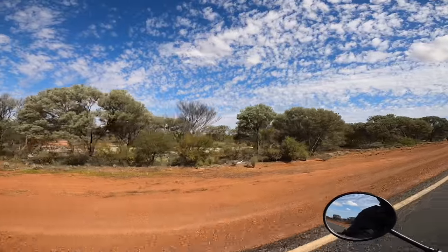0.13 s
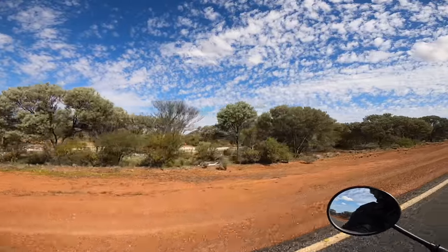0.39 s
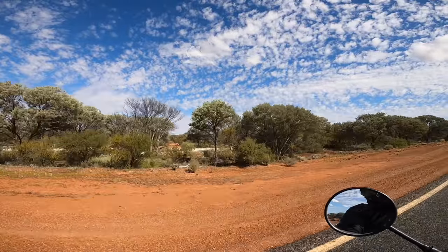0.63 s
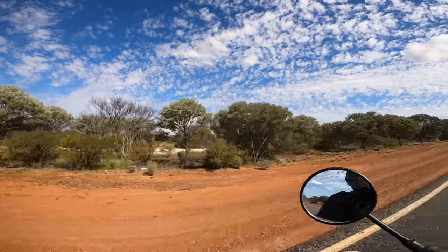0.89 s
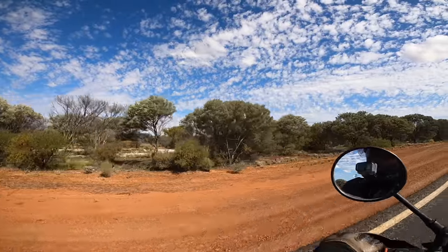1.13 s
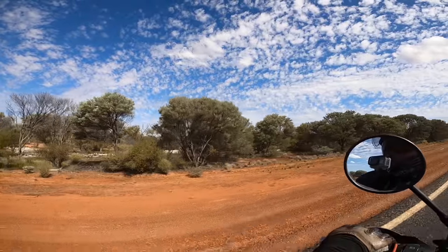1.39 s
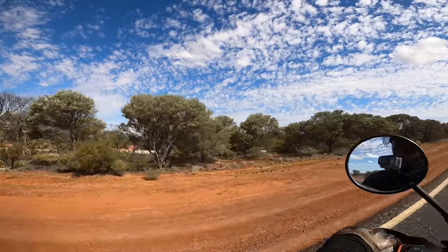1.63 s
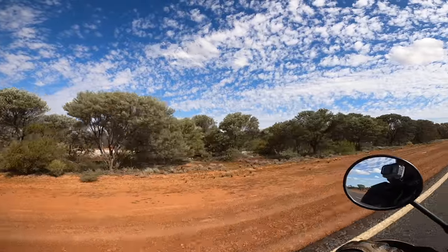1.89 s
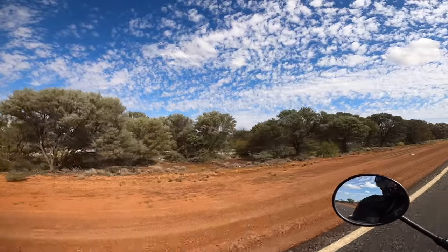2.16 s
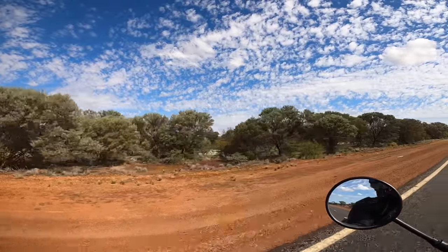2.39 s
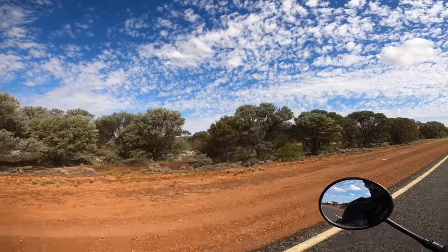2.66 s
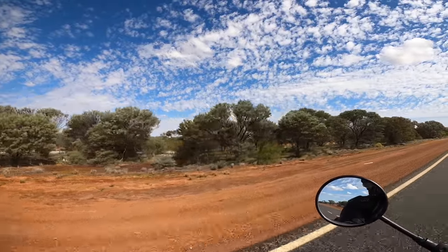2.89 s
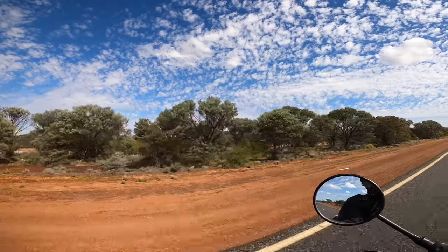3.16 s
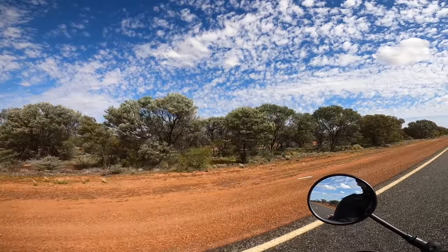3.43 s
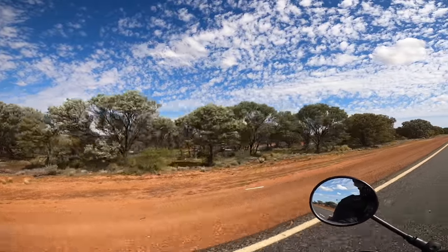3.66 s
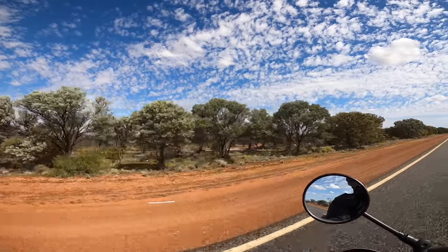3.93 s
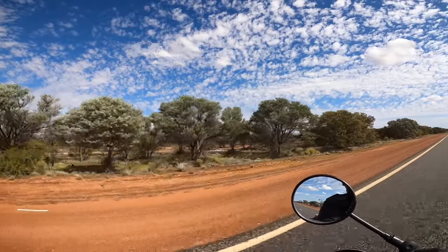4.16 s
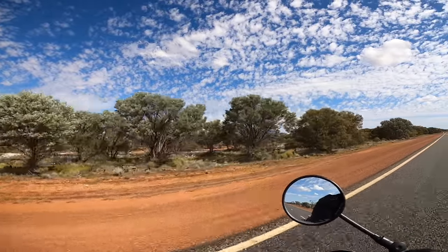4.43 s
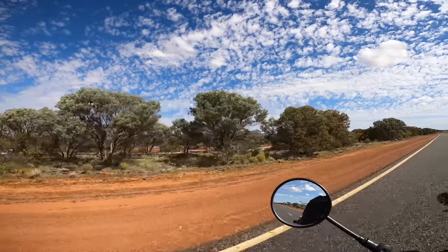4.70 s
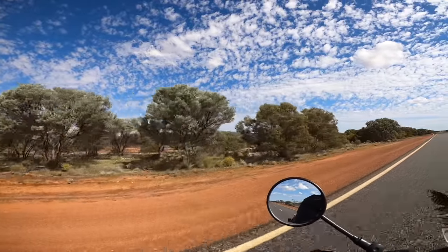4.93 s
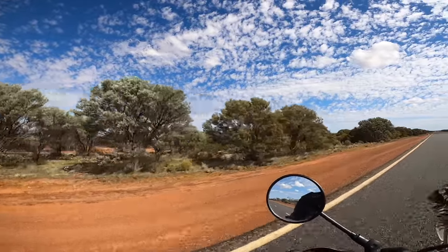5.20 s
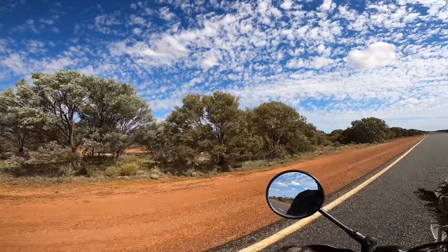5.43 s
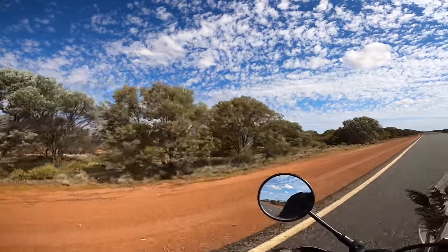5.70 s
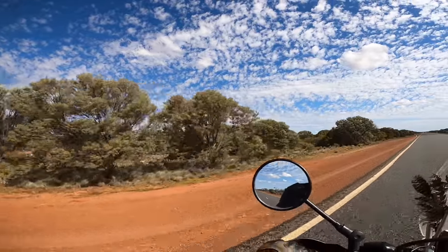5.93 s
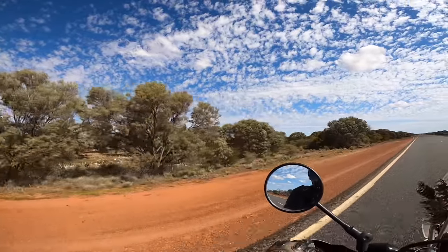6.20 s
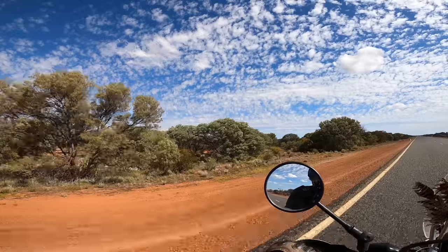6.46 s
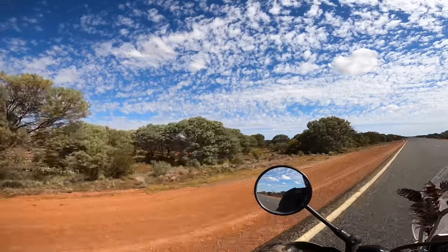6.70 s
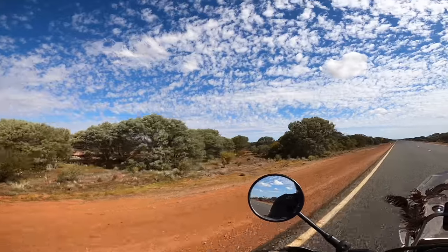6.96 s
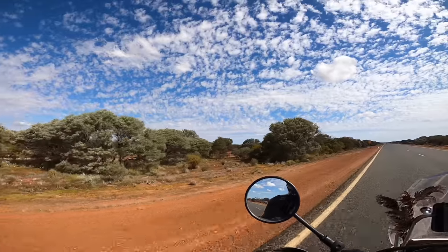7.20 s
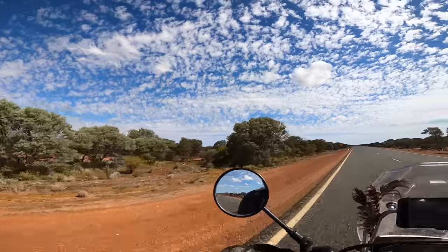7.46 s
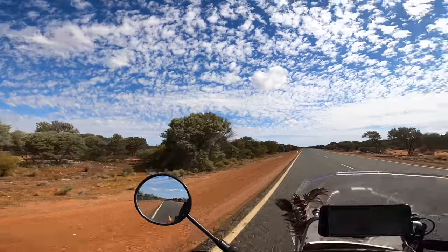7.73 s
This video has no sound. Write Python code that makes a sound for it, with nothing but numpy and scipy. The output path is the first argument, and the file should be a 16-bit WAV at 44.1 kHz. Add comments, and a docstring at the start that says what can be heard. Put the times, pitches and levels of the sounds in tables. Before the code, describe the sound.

A single-cylinder motorcycle pulls up through two gear changes while strong wind thumps and rumbles against a rider's microphone, with small clicks.

```python
"""Motorcycle through two gear changes

A single-cylinder motorcycle accelerates on an open road, heard by a helmet camera.
The air stream sheds eddies that thump the microphone near 50 Hz, and rushes past its ports as coloured noise.
Firing pulses and valve ticks ring the resonances of the housing, beside pure tones locked to engine speed.
Short single clicks, knocks and some sharper firing pulses, stand out; a limiter holds the thumps down.
"""
import sys
import numpy as np
from scipy import signal
from scipy.fft import rfft, irfft, next_fast_len
from scipy.io import wavfile
from scipy.ndimage import uniform_filter1d

SR = 44100
rng = np.random.default_rng(int(sys.argv[2]) if len(sys.argv) > 2 else 0)


def generate_wav(signal):
    """Clip the signal to [-1, 1] and save it as 16-bit WAV at the path in sys.argv[1]."""
    frames = np.transpose(np.atleast_2d(signal))
    scaled = np.clip(frames, -1, 1) * 32767
    pcm = np.round(scaled).astype(np.int16)
    wavfile.write(sys.argv[1], SR, pcm)


def gain_from_db(level_db):
    """Convert decibel levels to linear amplitude factors (20 dB per decade)."""
    decades = np.asarray(level_db, float) / 20
    return 10 ** decades


N = 345744
TIME = np.arange(N) / SR  # s
HZ = np.fft.rfftfreq(next_fast_len(N + SR // 4), 1 / SR)  # frequency bins, with room for ringing tails

# resonances of the microphone housing: centre_hz, width_hz, left_db, right_db, right_phase_rad
HOUSING_MODES = [(274, 33.3, 1.5, 0.4, -0.12), (501.7, 67.5, -4.5, -7.5, 0), (608.4, 36.3, -6.5, -9.5, 0),
                 (738, 133, -12.5, -16, 0.73), (1084, 105, -10, -12, 0.17), (1361, 141, -13.5, -20, 0.81),
                 (1666, 221, -12, -12.5, 1), (2224, 173, -9, -13, 2.5), (2499, 125, 0.5, -5.5, 1.85),
                 (3190, 710, -19, -21.5, 0), (3785, 150, -14, -22.5, 1), (4737, 227, -21, -11, -0.5),
                 (5350, 1300, -39, -28, 5.5), (7640, 1800, -50, -44.5, 0)]
# the air stream over time: time_s, buffeting_db, port_rush_db, rush_brightness_db
AIR_STREAM = [(0.0, -18.5, -33.5, 2.7), (0.5, -20, -34.5, 1.1), (0.8, -13.5, -31, -2.7),
              (1.0, -22.5, -32.5, -2.5), (1.08, -21.5, -36, -3), (1.45, -26.5, -39, -0.5),
              (1.75, -21.5, -36.5, -1.5), (1.85, -21, -34, -2.5), (2.3, -24, -32, -0.5),
              (3.15, -23, -34.5, 0.4), (3.45, -22.5, -37, 1.1), (3.85, -18, -31.5, 0.5),
              (4.4, -21.5, -36.5, 1), (4.9, -26, -38.5, 2.8), (5.45, -23, -33.5, -1.4),
              (5.7, -26.5, -41.5, -1.1), (6.12, -30.5, -40.5, -1.2), (6.25, -20.5, -37, -1.6),
              (7.0, -23, -36, -0.6), (7.33, -19.5, -35, -1), (7.42, -28.5, -40, 0.3),
              (7.84, -29.5, -41, -0.3)]
# short gusts on top of the buffeting and the rush: middle_s, swell_db
GUST_SWELLS = [(.01, 1), (.28, 2), (.41, 5), (.59, 4.5), (.97, 2.5), (2.05, 1.5), (2.25, 3), (2.97, 1),
               (3.23, 0), (3.43, 0), (3.69, 2), (4.5, 1), (4.65, 2), (5.24, -1), (5.41, -1), (5.8, 2.5),
               (5.92, 3), (6.68, 2.5), (6.99, 3), (7.56, 0.5)]
# spectrum of the rush before the housing: frequency_hz, density_db
RUSH_SPECTRUM = [(100, -1.5), (280, -5), (500, -8.5), (800, -3.5), (1100, 1.5), (1900, -7.5), (2500, -17),
                 (2800, -12), (3200, -6), (4200, -8), (5000, -10), (8000, -3.5)]
# how alike the rush is at the two ports before the housing: frequency_hz, shared_power (0 to 1)
PORT_SHARING = [(330, .999), (600, .97), (800, 0.88), (1500, .86), (2500, .85), (3500, 0.8), (4500, 0.36),
                (7000, 0.3)]
# eddies shed against the microphone: time_s, mean_shedding_hz, thump_db
EDDY_SHEDDING = [(0.0, 50.85, -18), (0.3, 56.28, -17.5), (0.72, 62.97, -23.5), (1.0, 51.52, -17),
                 (1.75, 51.43, -16.5), (2.1, 59.82, -18), (2.5, 46.3, -15), (2.9, 53.62, -17),
                 (3.55, 54.86, -18.5), (4.1, 51.5, -18), (4.3, 47.34, -16), (4.5, 53.33, -17.5),
                 (4.75, 45.13, -14), (5.18, 53.73, -17.5), (5.4, 47.6, -13.5), (5.95, 53, -15),
                 (6.55, 49.8, -15), (7.25, 53.22, -15.5), (7.55, 48.86, -14.5), (7.84, 54.7, -13)]
# short random dips and swells in the level of the low rumble: middle_s, dip_db (negative swells)
RUMBLE_DIPS = [(.11, 12), (.24, 10), (.63, 3), (.82, 30), (1.22, 25), (1.31, 0), (1.55, 2), (1.72, 17),
               (1.8, 19), (1.99, 7), (2.05, 21.5), (2.31, 6), (2.44, 8), (2.57, 20), (2.81, 12), (2.97, 12),
               (3.3, 4), (3.52, 14), (3.66, 33), (3.8, 28), (4.13, 13), (4.31, 15), (4.45, 3), (4.76, 8),
               (4.93, 7), (5.2, -0.5), (5.54, 10), (5.65, 5), (5.82, 11), (6.05, 5), (6.29, 28), (6.74, 10),
               (6.92, -3.5), (7.07, 26), (7.18, 12), (7.29, 13), (7.49, 12.5), (7.69, 22)]
# spectrum of the low buffeting: frequency_hz, density_db
BUFFET_SPECTRUM = [(12, -31), (22, -11.5), (32, -2), (45, 0.5), (80, -5), (110, -9.5), (160, -13),
                   (200, -16.5), (300, -22), (450, -38), (900, -70)]
# short single clicks, knocks and some sharper firing pulses:
# start_s, dull_peak_db, treble_burst_peak_db, burst_centre_hz
SHARP_CLICKS = [(0.268, -22, -25, 1450), (0.473, -21, -30, 1600), (0.572, -28, -38, 4000),
                (0.828, -25, -40, 3000), (1.374, -30, -46, 3000), (1.682, -26, -42, 3000),
                (1.751, -30, -30, 1450), (1.907, -30, -32, 1600), (1.929, -30, -34, 1450),
                (2.313, -24, -30, 1700), (2.391, -25, -31, 1400), (2.476, -24, -37, 3300),
                (3.232, -19, -30, 1350), (3.908, -26, -38, 3300), (5.4, -27, -32, 3000),
                (6.223, -30, -40, 3000), (6.477, -32, -34, 3600), (6.494, -25, -33, 1400),
                (7.054, -32, -40, 4300), (7.106, -26, -38, 3800)]
# engine speed through two gear changes: time_s, firings_per_s
ENGINE_SPEED = [(0.0, 55.43), (0.26, 56.95), (0.52, 58.91), (0.6, 57), (0.95, 41), (1.06, 38.8),
                (1.1, 38.68), (2.03, 46.33), (2.66, 51.08), (3.28, 55.2), (3.9, 58.95), (4.53, 62),
                (5.15, 64.67), (5.46, 65.64), (5.55, 64.2), (5.97, 49.3), (6.0, 48.73), (6.31, 50.11),
                (6.92, 52.32), (7.53, 54.35), (7.84, 55.53)]
# engine load, before the closed-throttle losses: time_s, exhaust_db, valve_tick_db
ENGINE_LOAD = [(0.0, -29, -39), (0.25, -32, -40), (0.48, -33.5, -41.5), (0.56, -33, -45), (0.75, -25, -42),
               (0.82, -30.5, -39), (0.87, -26, -31), (0.95, -24.5, -30.5), (1.03, -23, -32.5),
               (1.08, -30.5, -46), (1.5, -33.5, -67), (2.1, -29.5, -58), (2.3, -29, -51.5),
               (2.7, -32, -38.5), (3.1, -33, -44.5), (3.4, -33, -44), (3.7, -34, -47), (4.55, -36, -47.5),
               (5.45, -42, -47.5), (5.55, -40, -50), (5.92, -35.5, -39), (6.05, -36.5, -48),
               (6.5, -34.5, -45.5), (6.9, -34.5, -46), (7.4, -36, -46.5), (7.84, -40, -48.5)]
# spectrum of one exhaust pulse before the housing: frequency_hz, density_db
EXHAUST_SPECTRUM = [(40, -8.5), (150, -3.5), (280, 1), (350, -1), (420, -2), (500, 2), (620, -1.5),
                    (780, -13), (1000, -2.5), (1200, -8), (2000, -23.5), (4000, -47.5)]
# the higher overtones leave the pipe later: frequency_hz, delay_s
PIPE_DELAY = [(300, 0), (420, .0006), (700, .002)]
# the valve cover rings with each tick, its second ring only at speed: centre_hz, width_hz, ring_db
COVER_RINGS = [(2585, 105, 18), (2230, 170, 24)]
# engine and gear tones that come and go, before their left-right lean:
# middle_s, half_length_s, peak_db, cycles_per_firing
ENGINE_TONES = [(.3, .22, -52, 52), (.25, .25, -36, 19), (.3, .22, -39, 17), (.4, .3, -30, 5),
                (.25, .25, -55, 42), (2.4, .17, -46, 52), (2.62, .13, -50, 50), (2.85, .3, -50, 19),
                (4.25, .6, -47, 16), (4.1, .5, -51, 17), (6.25, .3, -58, 52), (7.5, .3, -63, 52)]


def rms_one(x):
    """Scale to rms 1."""
    return x / np.sqrt(np.mean(x ** 2) + 1e-20)


def in_time(rows):
    """Each column of a curve table at every sample."""
    s, *columns = np.transpose(rows)
    return [np.interp(TIME, s, c) for c in columns]


def at_hz(points):
    """A short spectrum read at every frequency bin, along a log frequency axis."""
    hz, values = np.transpose(points)
    return np.interp(np.log(HZ + 1), np.log(hz), values)


def swells(rows, half_s):
    """Sum of bell-shaped swells in dB, one per (s, dB) row; half_s is the spread of the bell."""
    t = np.arange(0, N + 64, 64) / SR
    s, db = np.transpose(rows)
    bells = np.exp(-.5 * ((t - s[:, None]) / half_s) ** 2)
    return np.interp(TIME, t, db @ bells)


def through(x, response):
    """Filter by a frequency response."""
    size = 2 * (len(HZ) - 1)
    return irfft(rfft(x, size) * response, size)[..., :N]


def above(hz, steepness):
    """Response that passes what lies above hz, without phase shift."""
    return 1 / (1 + (hz / (HZ + 1)) ** steepness)


def resonance(hz, width):
    """Response of a damped mass on a spring, 1 at its peak."""
    return 1j * HZ * width / (hz ** 2 - HZ ** 2 + 1j * HZ * width)


def causal(db):
    """The response of these levels that rings only after the blow (minimum phase)."""
    cepstrum = irfft(db * np.log(10) / 20)
    cepstrum[1:len(HZ) - 1] *= 2
    return np.exp(rfft(cepstrum * (np.arange(len(cepstrum)) < len(HZ))))


def drift(rate):
    """Random wandering, mostly slower than rate in Hz; spread 1."""
    lowpass = 1 / (1 + 1j * HZ / rate) ** 2
    return rms_one(through(rng.standard_normal(N), lowpass * (HZ > .3)))


def pulses(cycles, spread_db, jitter_s):
    """One click per cycle, placed between samples, each of its own strength."""
    at = np.interp(np.arange(np.ceil(cycles[0]), cycles[-1]), cycles, np.arange(N))
    chance = rng.standard_normal((len(at), 2))
    at = np.clip(at + jitter_s * SR * chance[:, 0], 0, N - 2)
    whole = at.astype(int)
    strength = gain_from_db(spread_db * chance[:, 1])
    out = np.zeros(N)
    out[whole] = strength * (1 - at + whole)
    out[whole + 1] = strength * (at - whole)
    return out


def housing():
    """Left and right response of the housing: resonances in parallel, signs alternating."""
    out = np.zeros((2, len(HZ)), complex)
    for k, (hz, width, left_db, right_db, turn) in enumerate(HOUSING_MODES):
        mode = (-1) ** k * resonance(hz, width)
        out += mode * [[gain_from_db(left_db)], [gain_from_db(right_db) * np.exp(1j * turn)]]
    return out


def gusts():
    """Short swells of the air stream in dB."""
    return swells(GUST_SWELLS, half_s=.046)


def rush(body):
    """Turbulence at the ports, shared in the bass and private in the treble; each range flickers by itself."""
    _, rush_db, brightness_db = in_time(AIR_STREAM)
    rush_db = rush_db + gusts()
    hiss_db = rush_db - 3.5 + brightness_db
    alike = np.clip(at_hz(PORT_SHARING), 0, 1)
    shared, own = rng.standard_normal(N), rng.standard_normal((2, N))
    air = through(shared, np.sqrt(alike)) + through(own, np.sqrt(1 - alike))
    colour = gain_from_db(at_hz(RUSH_SPECTRUM)) * body
    colour = colour / np.sqrt(np.mean(np.abs(colour) ** 2))
    low = 1 / (1 + (HZ / 720) ** 6)
    high = above(2200, 6)
    flutter = 0.5 * drift(11)  # dB, common to all three ranges
    lows = through(air * gain_from_db(rush_db + flutter + 0.58 * drift(38)), colour * low)
    mids = through(air * gain_from_db(rush_db + flutter + 1.3 * drift(33)), colour * (1 - low - high))
    highs = through(air * gain_from_db(hiss_db + flutter + 1.5 * drift(42)), colour * high)
    return lows + mids + highs


def thumps():
    """Shed eddies: a low unsteady tone in rumble, under broad lumpy buffeting; both ports feel them alike."""
    hz, thump_db = in_time(EDDY_SHEDDING)
    buffet_db = in_time(AIR_STREAM)[0] + gusts()
    unsteady_hz = hz * (1 + .08 * drift(17))
    tone = np.sqrt(2) * np.sin(2 * np.pi * np.cumsum(unsteady_hz) / SR)
    rumble_band = resonance(33, 25) / (1 + (HZ / 70) ** 4)
    rumble = rms_one(through(rng.standard_normal(N), rumble_band))
    buffet = rms_one(through(rng.standard_normal(N), gain_from_db(at_hz(BUFFET_SPECTRUM))))
    # the level dips and swells briefly, as narrowband noise does when it beats
    eddy_db = thump_db - swells(RUMBLE_DIPS, half_s=.011) + 0.94 * drift(39)
    eddies = gain_from_db(eddy_db) * (tone + gain_from_db(-11.5) * rumble)
    both = eddies + gain_from_db(buffet_db + 2.14 * drift(12.0)) * buffet
    left_lag_s = .00006  # the thumps reach the left port a little later
    left = through(both, np.exp(-2j * np.pi * HZ * left_lag_s))
    return np.array([left, both]) * gain_from_db([[.7], [-.8]])


def sharp_clicks(body):
    """Each click is one dull pulse through the housing and a short burst of grains of its own brightness."""
    dull, bright = np.zeros(N), np.zeros(N)
    t = np.arange(400) / SR
    decay_s, rise_s = .0025, .0003
    band_span = 1.35  # the band reaches this factor either side of the centre
    envelope = np.exp(-t / decay_s) * (1 - np.exp(-t / rise_s))
    all_grains = rng.standard_normal((len(SHARP_CLICKS), 400))
    for (s, db, bright_db, hz), grains in zip(SHARP_CLICKS, all_grains):
        i = round(s * SR)
        dull[i] = gain_from_db(db)
        band = signal.butter(4, [hz / band_span, hz * band_span], "band", fs=SR, output="sos")
        burst = signal.sosfilt(band, envelope * grains)
        bright[i:i + 400] += gain_from_db(bright_db) * burst / np.abs(burst).max()
    thud = body * (1j * HZ / (800 + 1j * HZ)) ** 6 / (1 + 1j * HZ / 1100) ** 8
    return through(dull, thud / np.abs(irfft(thud)).max()) + bright


def exhaust_note(cycles, revs, shut, body):
    """Firing pulses through pipe and housing; overtones grow with speed and fade on a shut throttle."""
    firing = pulses(cycles, spread_db=1.0, jitter_s=.00005)
    # summing the delay over frequency gives the phase of the pipe
    pipe_phase = 2 * np.pi * HZ[1] * np.cumsum(at_hz(PIPE_DELAY))
    pipe = causal(at_hz(EXHAUST_SPECTRUM)) * np.exp(-1j * pipe_phase)
    note = through(firing, pipe * body)
    bark = gain_from_db(.5 * (revs - 52)) - 1  # half a dB per firing/s, neutral at 52 firings/s
    note = note + bark * through(note, above(850, 8))
    note = note - shut * (1 - gain_from_db(-15)) * through(note, above(340, 6))
    return rms_one(note)


def valve_train(cycles, revs, shut, body):
    """Two valve ticks a cycle ring the cover and the upper housing; loose parts rattle just after the first."""
    always, at_speed = (gain_from_db(db) * resonance(hz, width) for hz, width, db in COVER_RINGS)
    hard = np.clip((revs - 52) / 6, 0, 1)  # the second ring sets in from 52 to 58 firings/s
    upper = body * (1j * HZ / (2100 + 1j * HZ)) ** 4 / (1 + (HZ / 2800) ** 10)
    tick_cycles = cycles + .24  # the tick leads the firing by this share of a cycle
    first = pulses(tick_cycles, spread_db=1.5, jitter_s=.000015)
    # the second valve seats a little under half a cycle later, so at speed every other overtone stands out
    second = pulses(tick_cycles - .4615, spread_db=1.5, jitter_s=.000015)
    ticks = first + np.clip((revs - 50) / 13, 0, 1) * second  # full strength at 63 firings/s
    ticks = through(ticks, upper * (1 + always)) - through(hard * ticks, upper * at_speed)
    gate = np.exp(-(tick_cycles % 1) / .3)
    clatter = through(gate * rng.standard_normal(N), upper * (1 + always / 4))
    clatter_db = -11 + 6 * shut  # more rattle with the throttle shut
    return rms_one(ticks) + gain_from_db(clatter_db) * rms_one(clatter)


def engine_whine(cycles):
    """Sine tones locked to the engine speed; the higher the order, the more it leans left."""
    whine = np.zeros((2, N))
    for s, half, db, order in ENGINE_TONES:
        lean_db = order * np.array([[.05], [-.08]])
        fade = np.exp(-.5 * ((TIME - s) / half) ** 4)
        whine += gain_from_db(db + lean_db) * fade * np.sin(2 * np.pi * order * cycles)
    return whine


def engine(body):
    """Exhaust, valve train and whine, all driven by one count of firing cycles."""
    exhaust_db, tick_db = in_time(ENGINE_LOAD)
    revs = in_time(ENGINE_SPEED)[0]
    cycles = np.cumsum(revs) / SR + .86  # share of a cycle already run at the start
    # falling revs mean a shut throttle
    shut = uniform_filter1d(1. * (np.diff(revs, prepend=0) < 0), size=2000)
    exhaust = gain_from_db(exhaust_db) * exhaust_note(cycles, revs, shut, body)
    valves = gain_from_db(tick_db - 7.5 * shut) * valve_train(cycles, revs, shut, body)
    return exhaust + valves + engine_whine(cycles)


def scene():
    """Rush, dull clicks, exhaust and valves sound through the housing; thumps, treble bursts and whine do not."""
    body = housing()
    return rush(body) + thumps() + sharp_clicks(body) + engine(body)


def band_limit(x):
    """A steep low-pass at the top of the band."""
    return signal.sosfilt(signal.butter(12, 15650, fs=SR, output="sos"), x)


def record(dry):
    """A limiter follows the peaks and ducks all under the thumps; a steep shelf dulls all above about 8 kHz."""
    level_db = 20 * np.log10(np.abs(dry).max(axis=0) + 1e-9)
    fall = TIME * 60  # release, dB per second
    held = np.maximum.accumulate(level_db + fall) - fall
    over = uniform_filter1d(np.maximum(held + 7.23, 0), size=300)  # dB above the threshold
    limited = dry * gain_from_db(-.85 * over)
    shelf = 1 / (1 + (HZ / 7850) ** 30) + gain_from_db(-12.5)
    mix = through(limited, shelf)
    return band_limit(mix)


dry = scene()
out = record(dry)
generate_wav(out)
```